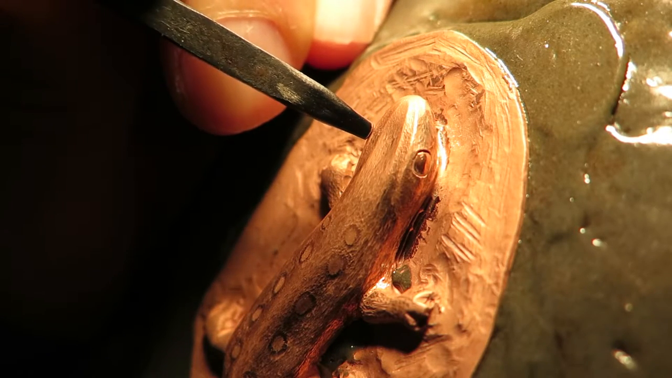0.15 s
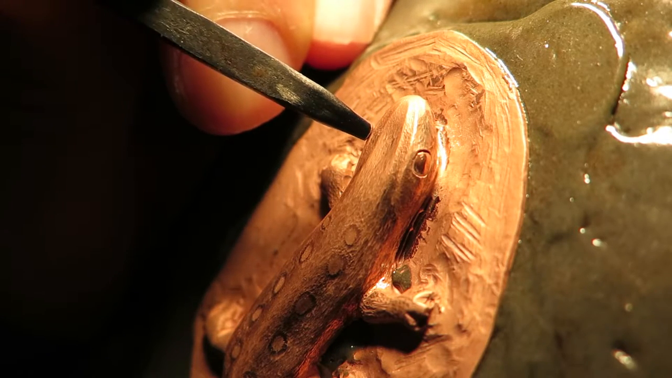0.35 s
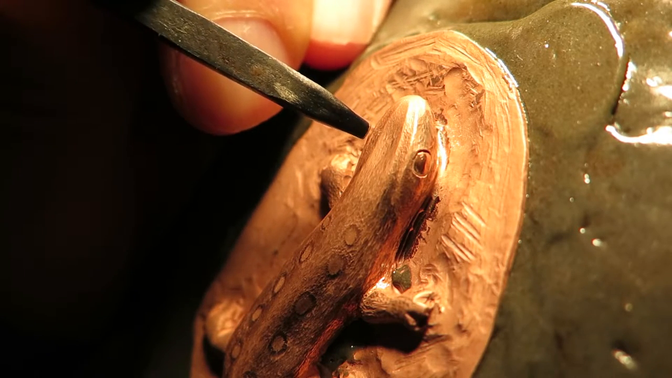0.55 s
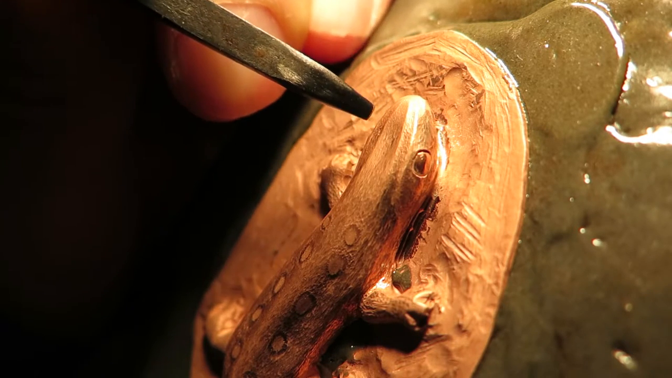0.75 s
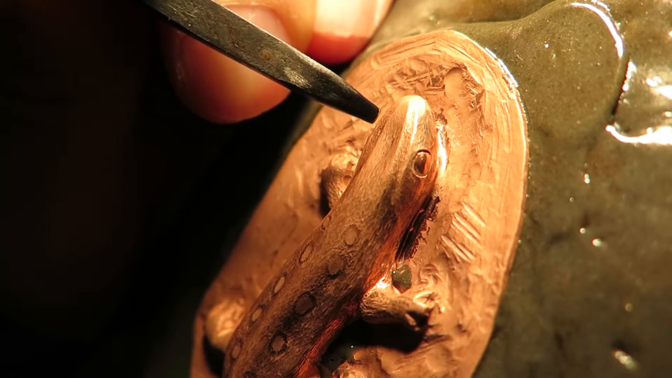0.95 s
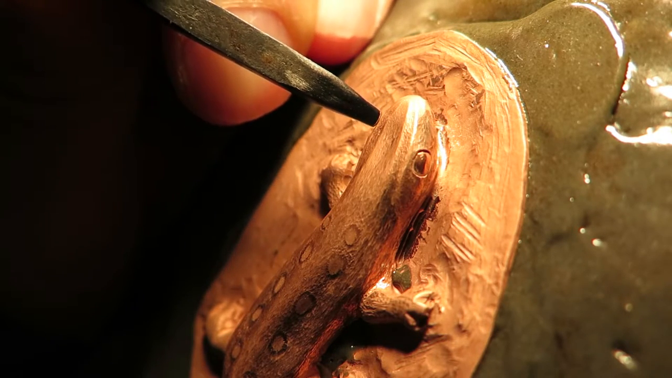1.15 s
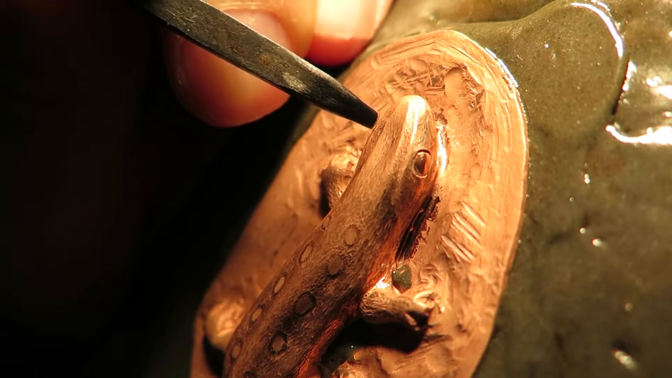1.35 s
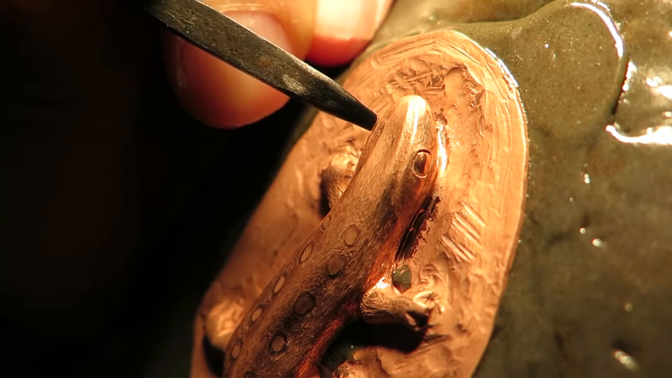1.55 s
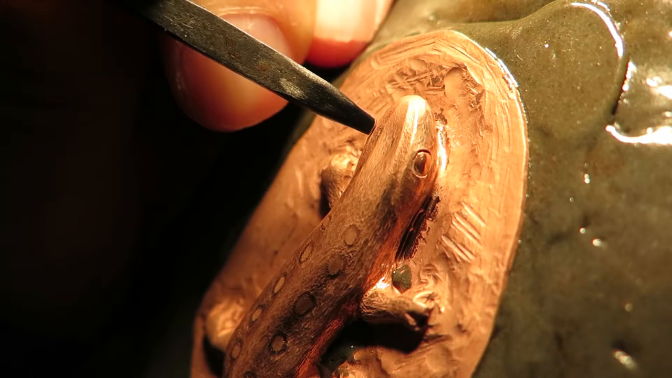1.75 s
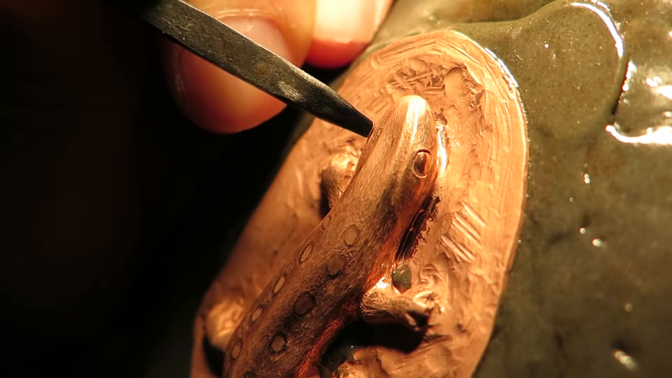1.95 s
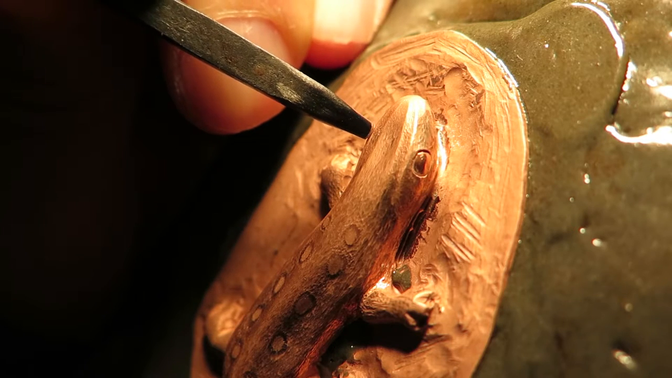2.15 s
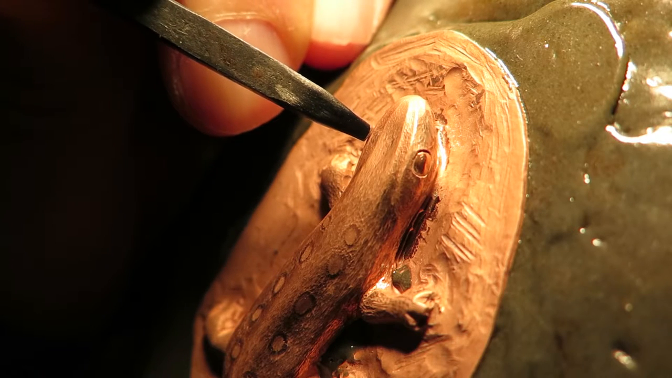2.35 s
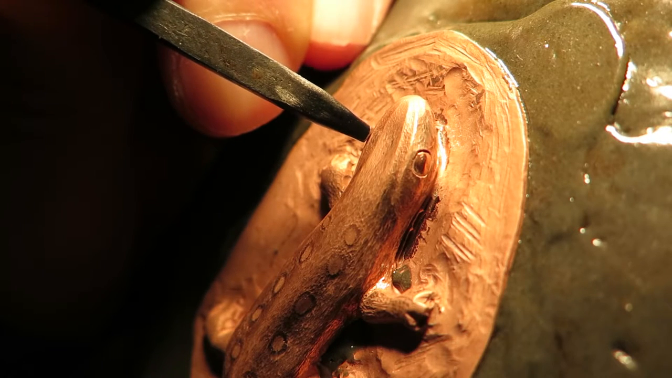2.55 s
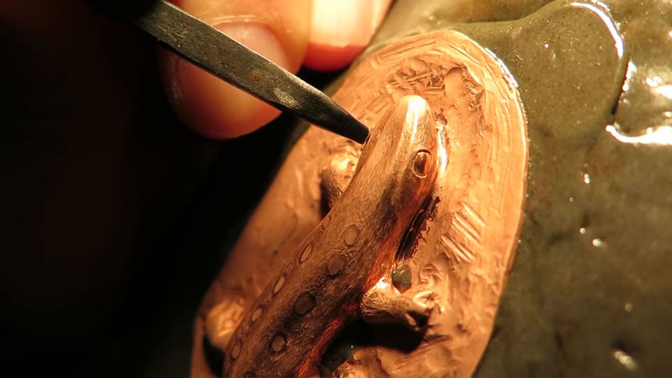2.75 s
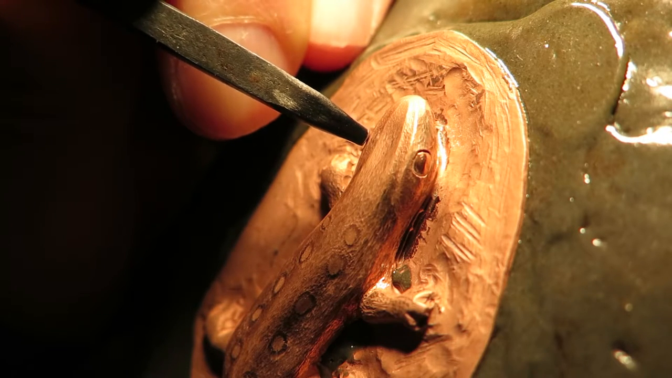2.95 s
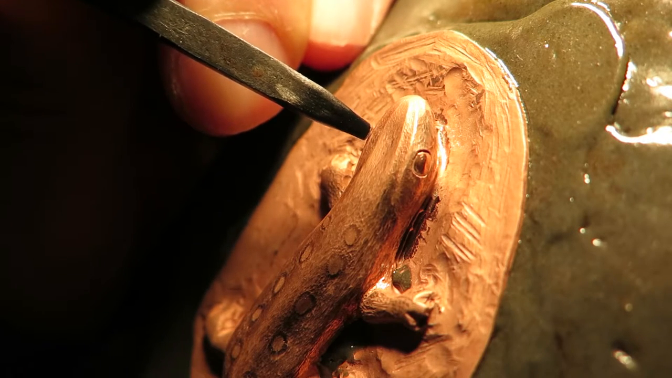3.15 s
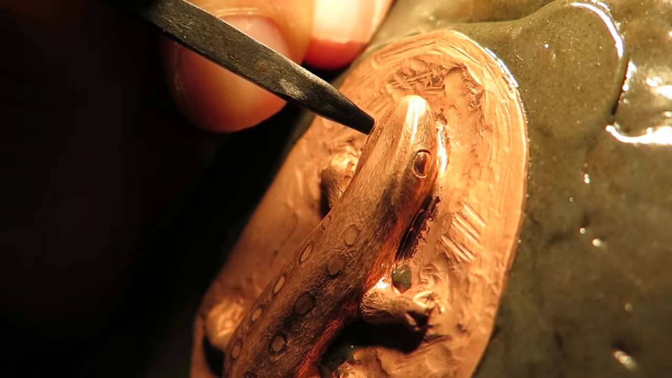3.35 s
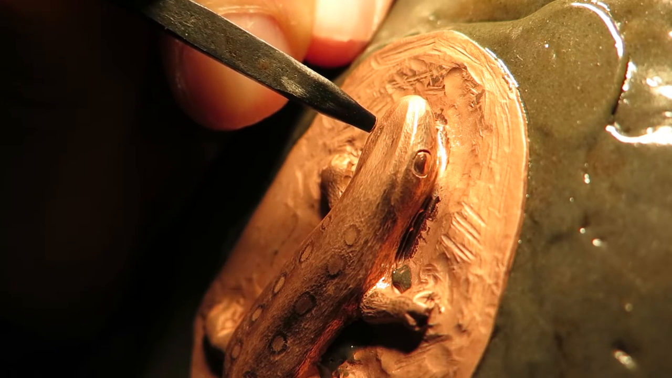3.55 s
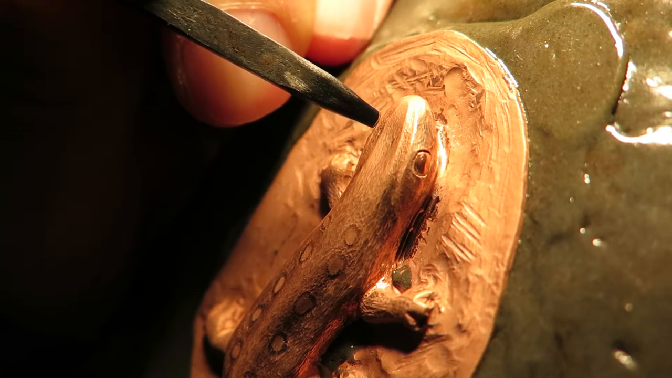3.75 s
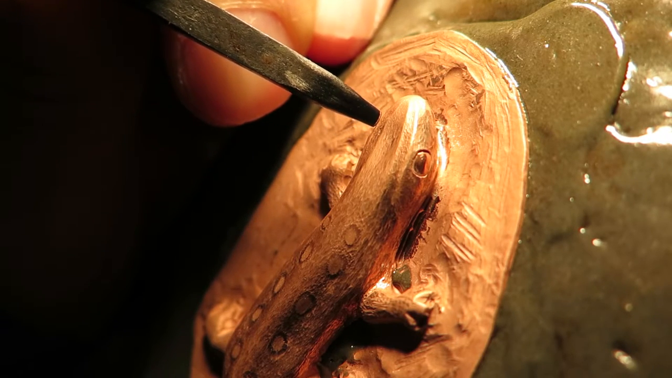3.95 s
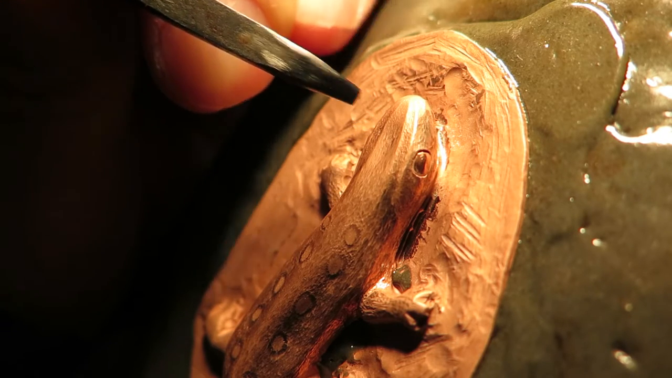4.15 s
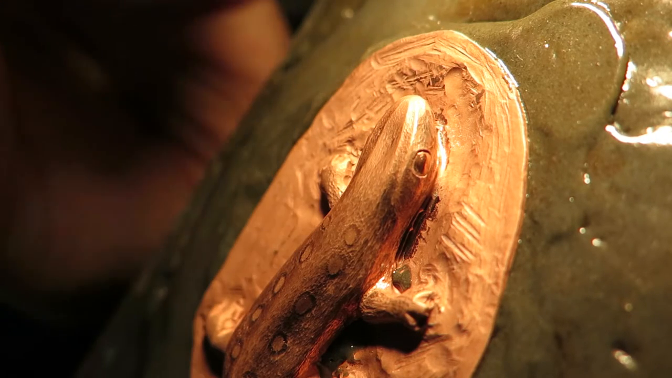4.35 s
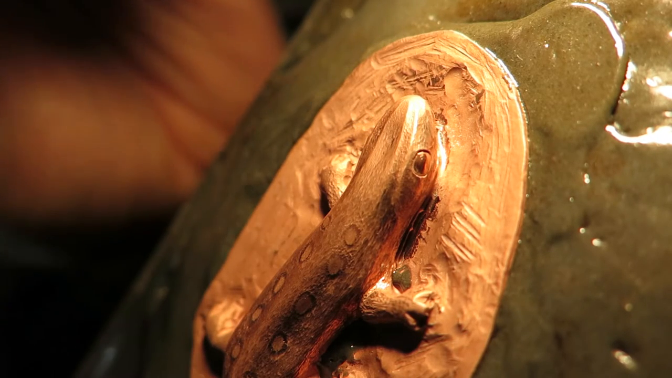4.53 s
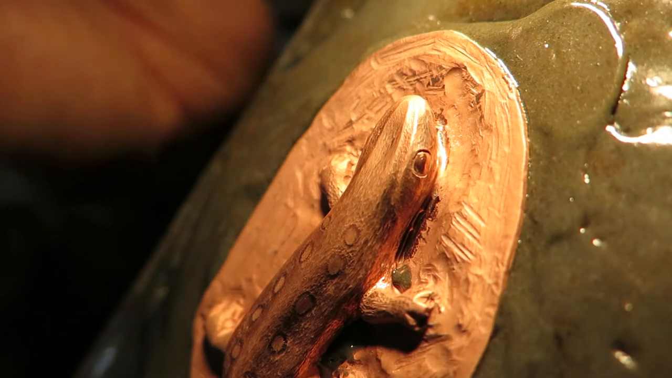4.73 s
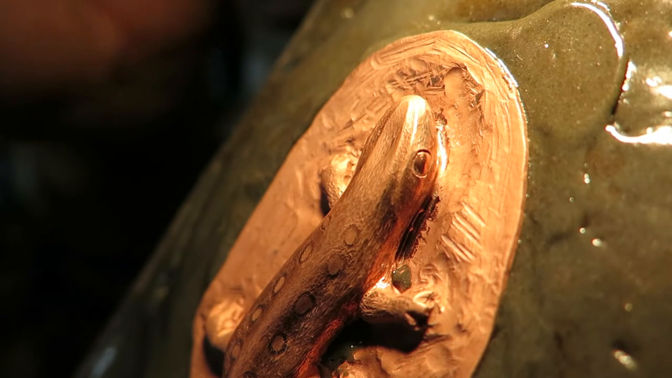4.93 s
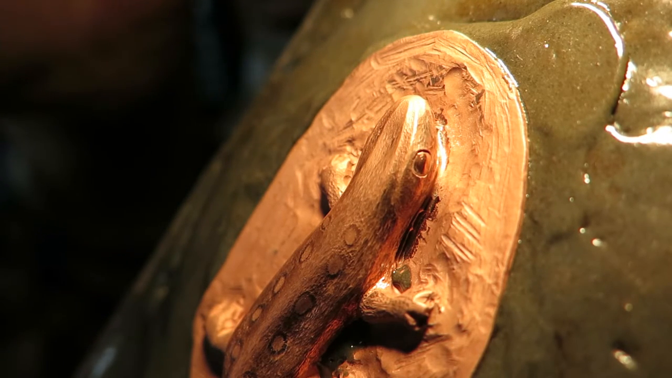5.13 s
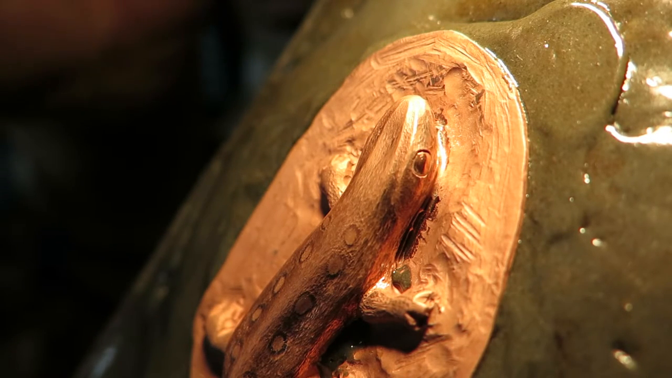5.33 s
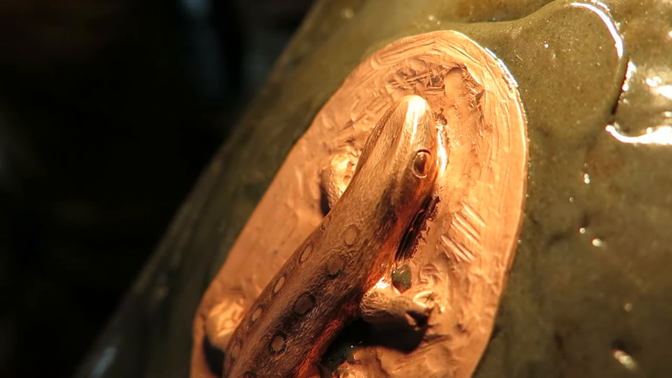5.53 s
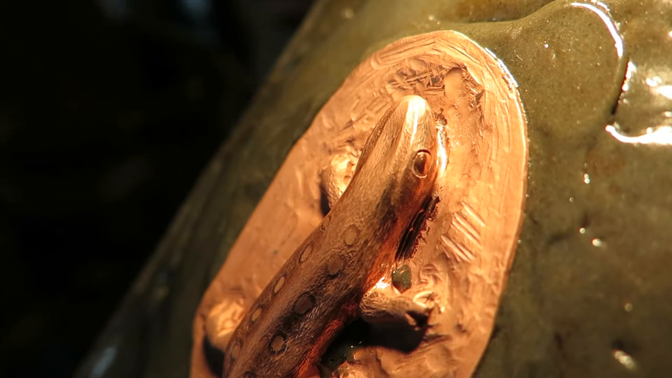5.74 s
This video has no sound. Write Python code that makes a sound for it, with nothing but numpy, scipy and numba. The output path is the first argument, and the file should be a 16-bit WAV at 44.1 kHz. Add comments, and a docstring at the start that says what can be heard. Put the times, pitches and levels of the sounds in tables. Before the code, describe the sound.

Close to a camera's stereo microphones in a quiet small workshop, a light hammer strikes a steel punch against copper bedded in pitch. About twenty crisp, dry taps come unevenly, some hard and piercing, others faint, with a pause after the first four. They stop near four seconds; faint skin brushes and a soft low rush follow over steady room air.

```python
"""A hard, bright tap over quiet room air: a small hammer drives a steel punch, close to a camera's microphones.
The punch is chasing a copper relief bedded in pitch. Hammer and punch are sums of fading modes, clicks and noise.
The tip lands with the blow or up to 4 ms after it; on landing, copper and pitch answer lower, and the room reflects.
Overloads duck the camera's gain, which creeps back over the steady air, mains hum and low rumble.
The hand then draws away in faint brushes of noise, and a soft low rush swells to a peak."""
import sys
import numpy as np
from scipy import signal
from scipy.fft import rfft, irfft, next_fast_len
from scipy.io import wavfile
from numba import njit

SR = 44100
rng = np.random.default_rng(int(sys.argv[2]) if len(sys.argv) > 2 else 0)


def dump_mix(stems):
    """Bounce the given channels to the path in sys.argv[1] as a 16-bit WAV at rate SR."""
    frames = np.atleast_2d(stems).T  # one column per channel
    limited = np.clip(frames, -1, 1)  # hard clip at full scale
    pcm = np.round(limited * 32767).astype(np.int16)
    wavfile.write(sys.argv[1], SR, pcm)


N = 255336  # samples

# Taps of the hammer; bite is how firmly the tip sits on the work:
# (time [s], delay until the tip lands [s], strength [dB], bite [dB], sharpness of the contact [dB])
TAPS = [(0.046, 0, 6, 4.5, 7.5), (0.1891, 0.0014, 2.5, 2.5, -3), (0.3393, 0.00033, 0, 3, -6),
        (.521, 0.0015, -9, -3.5, -4), (1.1711, 0, 0, -9, 1), (1.398, 0.00061, -1.5, -3, -4),
        (1.5645, 0.0028, -1.5, -4, -3), (1.8029, 0, -4, 2, -14), (1.9936, 0.00033, 10, 6.5, 13.5),
        (2.1614, 0.00043, 0, 4, -1), (2.2958, 0.00093, -15.5, -1.5, 8.5), (2.44, 0.0011, -5, 1.6, 6),
        (2.6143, .0006, 7, -8.5, -3.5), (2.7743, 0, 1.5, 1, 0), (2.9682, 0.00048, -22.5, -3, 2),
        (3.1561, 0.0015, 2, -3, 0.5), (3.3254, 0.0037, -7.5, -1.5, 7.5), (3.7141, 0.00064, 6.5, 3, 0.5),
        (3.8987, 0.0011, 2.5, 2, -14), (3.9732, 0, -17, 3, -18)]
# Modes of each part, before scatter: (frequency [Hz], relative level [dB], decay by 60 dB [s])
WORK_MODES = [(1143, -3.5, 0.0082), (1410, -11.5, 0.017), (1617, -12.5, 0.042), (1767, -13, 0.071),
              (1800, -9, 0.018), (2213.5, 4.5, 0.035), (2230, -20, 0.16), (2294, -10.5, 0.058),
              (2654, -14.5, 0.038), (2963, -8, 0.062), (3534, -21.5, 0.035)]  # the copper on its bed
BOWL_MODES = [(185, -14.5, 0.21), (672.5, -4, 0.13), (821, -8.5, 0.11), (1045.6, 1, 0.14),
              (1029.4, -0.5, 0.098), (1108, -2.5, 0.083)]  # the bowl of pitch under it
HAMMER_MODES = [(8340, -2, .013), (8680, -3, .009), (9150, -7, .006), (9770, -12, .02), (10100, 0, .011),
                (10450, -4, .007), (10950, -2, .007), (11600, -5, .005), (12300, -8, .006)]  # the hammer head
PUNCH_MODES = [(3184, -15, 0.032), (4898, -6, 0.016), (5160, -5, 0.006), (5880, -3, 0.015),
               (6080, -1.5, .007), (6694, -3.5, 0.0092), (7610, -6, 0.011)]  # the punch, damped by the fingers
BRIGHT_MODES = [(12750, -5, .005), (13850, -2, .007), (14250, 0, .009)]  # the highest ring of the steel
# Colour of each part's click and contact noise: (frequency [Hz], relative level per Hz [dB])
WORK_CRACK = [(300, -11.5), (900, -9.5), (1200, 6.5), (2400, 7.5), (3300, -5), (4000, -21.5), (5000, -18.5),
              (7000, -29)]
BOWL_CRACK = [(50, -16), (220, -4), (600, 7), (900, -13), (1300, 9.5), (2500, -29)]
HAMMER_CRACK = [(2000, -56), (4500, -43), (7000, -23), (8300, 12), (11500, 0), (13000, -2.5),
                (16000, -23.5)]
PUNCH_CRACK = [(300, -47), (2500, -34), (4000, -2), (5800, -10), (7600, 9), (10000, -4.5)]
BRIGHT_CRACK = [(5000, -47), (11000, 3), (12700, -18.5), (14300, 14), (15000, -1), (16500, -25)]
# level of each part in a middling tap [dB]
WORK_DB, PUNCH_DB, HAMMER_DB, BOWL_DB, BRIGHT_DB = -24.5, -26.5, -22.5, -32.5, -26
# dB gained per dB of strength: hard taps are brighter
HAMMER_GROWS, BOWL_GROWS, BRIGHT_GROWS = 1.41, 0.9, 1.15
# dB per dB of bite: a firm tip drives the bowl and damps the highest ring
BITE_DRIVES_BOWL, BITE_DAMPS_BRIGHT = .46, 1.39
SHARP_LIFTS_HAMMER = 0.09  # dB per dB of sharpness
TRAVEL_S = .00008  # the blow's way down the punch and into the copper
STEEL_CRACK_T60 = .004  # s


def taps():
    """The hammer meets the punch, then the landing tip strikes the work and may jolt the steel again.
    A firm bite hands the blow on to the work; a loose one leaves it ringing in the punch."""
    track = np.zeros((2, N))
    for s, gap, strength_db, bite_db, sharp_db in TAPS:
        work_db = WORK_DB + strength_db + bite_db
        punch_db = PUNCH_DB + strength_db - bite_db
        bowl_db = BOWL_DB + BOWL_GROWS * strength_db + BITE_DRIVES_BOWL * bite_db
        hammer_db = HAMMER_DB + HAMMER_GROWS * strength_db + SHARP_LIFTS_HAMMER * sharp_db
        bright_db = BRIGHT_DB + BRIGHT_GROWS * strength_db - BITE_DAMPS_BRIGHT * bite_db + sharp_db

        bowl = amp(bowl_db) * struck(BOWL_MODES, BOWL_CRACK, click_db=-4.5, crack_db=-7,
                                     crack_t60=0.022, spread_db=-5.0)
        work = amp(work_db) * struck(WORK_MODES, WORK_CRACK, click_db=-5.5, crack_db=-11.5,
                                     crack_t60=0.023, spread_db=-3.5)
        add(track, s + gap + TRAVEL_S, bowl + work)

        # a punch that already rests on the work gets no second jolt, one that travels far only a weak one
        landing = np.clip((gap - .0002) / .0008, 0, .6) * np.exp(-gap / .004)
        for when, share in ((s, 1 - landing), (s + gap, landing)):
            hammer = amp(hammer_db) * struck(HAMMER_MODES, HAMMER_CRACK, click_db=-4.0, crack_db=-6.0,
                                             crack_t60=STEEL_CRACK_T60, spread_db=-1.5)
            punch = amp(punch_db) * struck(PUNCH_MODES, PUNCH_CRACK, click_db=-2.0, crack_db=1,
                                           crack_t60=STEEL_CRACK_T60, spread_db=2.5)
            bright = amp(bright_db) * struck(BRIGHT_MODES, BRIGHT_CRACK, click_db=2.0, crack_db=-2,
                                             crack_t60=STEEL_CRACK_T60, spread_db=-13)
            # the two jolts share the energy of the blow
            add(track, when, np.sqrt(share) * (hammer + punch + bright))
    return track


SCATTER_DB = 2  # spread of the mode levels from blow to blow
DETUNE = .0015  # relative spread of the mode frequencies


def struck(modes, crack, click_db, crack_db, crack_t60, spread_db):
    """One blow: a click, fading modes and contact noise. Rows: toward the microphone, into the room."""
    hz, db, t60 = np.transpose(modes)[:, :, None]
    # the steel's high modes die sooner, so its blows are kept shorter
    size = SR // 20 if hz.min() > 2500 else SR // 5
    t = np.arange(size) / SR
    strength, shift = rng.standard_normal((2, len(modes), 1))
    hz = hz * (1 + DETUNE * shift)  # every grip is a little different
    sign = (-1) ** np.arange(len(modes))[:, None]  # neighbouring modes swing opposite ways
    decay = amp(db + SCATTER_DB * strength - 60 * t / t60)
    ring = blow((sign * decay * np.sin(2 * np.pi * hz * t)).sum(0))
    push = blow(click(crack, size))
    burst = blow(noise(crack, size) * amp(-60 * t / crack_t60))
    direct = blow(ring + amp(click_db) * push + amp(crack_db) * burst)
    # summed over all directions the sound is more even than along one path
    spread = amp(spread_db) * blow(push + ring * 0.46)
    return np.array([direct, spread])


def click(spectrum, size):
    """A single sharp push, coloured causally (minimum phase) by the part it enters."""
    hz = np.fft.rfftfreq(size, 1 / SR)
    cepstrum = irfft(np.log(amp(along(spectrum, hz))), size)
    cepstrum[size // 2:] = 0
    return irfft(np.exp(rfft(2 * cepstrum)), size)


def blow(x):
    """x scaled to the energy of 16 ms at rms 1."""
    return x / np.sqrt(np.sum(x ** 2) / (.016 * SR) + 1e-20)


# The close taps at the two microphone ports: (frequency [Hz], phase by which left leads [rad])
PORT_LEAD = [(300, .4), (1600, .3), (2200, -1), (2900, .1), (4500, 1.3), (5300, .9), (6000, 2.2), (7400, 2),
             (8500, 2.9), (10000, 3.8), (10800, 5.2), (11400, 5.8), (12200, 7.8), (15000, 8.2)]
# Balance of the ports: (frequency [Hz], left minus right level [dB])
PORT_BALANCE = [(300, 3), (1500, 0.5), (2200, -2), (2900, 3), (4600, 3), (5600, 3.5), (7300, -3.5),
                (8400, -8.5), (10000, -5), (11000, 9), (12200, -3.5), (14300, -3.5)]


def ports(x):
    """The close source meets the ports with a phase offset at the right and unequal strength."""
    side, late = np.array([[1], [-1]]) / 2, np.array([[0], [1]])

    def response(hz):
        return amp(side * along(PORT_BALANCE, hz)) * np.exp(-1j * late * along(PORT_LEAD, hz))

    return filtered(x, response)


# Decay of the room's tail: (frequency [Hz], decay by 60 dB [s])
ROOM_T60 = [(200, 0.34), (1000, 0.088), (3000, 0.17), (9000, 0.12), (15000, 0.14)]


def workshop(x, bench_db, bench_t60, room_db):
    """Quick reflections from the bench and a short tail from the room: decaying noise, new for each tap."""
    wet, size = np.zeros((2, N + SR)), SR // 4
    t = np.arange(size) / SR
    starts = [round((row[0] - .01) * SR) for row in TAPS] + [N]  # 10 ms ahead of each tap
    for a, b in zip(starts, starts[1:]):
        hz, frame_t, z = signal.stft(rng.standard_normal((2, size)), SR, nperseg=128)
        fading = z * amp(-60 * frame_t / along(ROOM_T60, hz)[:, None])
        tail = signal.istft(fading, SR, nperseg=128)[1][:, :size]
        tail = tail * (1 - np.exp(-t / 0.0042))  # soft onset
        bench = rng.standard_normal((2, size)) * amp(-60 * t / bench_t60) * (1 - np.exp(-t / 0.0021))
        answer = (amp(bench_db) * unit(bench) + amp(room_db) * unit(tail)) / np.sqrt(size)
        echo = signal.fftconvolve(x[None, a:b], answer, axes=1)
        wet[:, a:a + echo.shape[1]] += echo
    return wet[:, :N]


# Brushes of the hand as it draws away: (time of the peak [s], level [dB], length [s])
BRUSHES = [(4.325, -52.5, 0.069), (5.04, -54, .05), (5.75, -51.5, 0.42)]
BRUSH_FADE_DB = 9  # lower at both ends of a brush than at its peak


def hand():
    """Skin brushes lightly as the hand leaves the work: coloured noise that swells and fades."""
    t = np.arange(N) / SR
    # (frequency [Hz], relative level per Hz [dB])
    skin = [(500, -40), (3000, 1), (7000, -4), (11000, 7), (14000, -3), (16000, -11)]
    pressure = sum(amp(db - BRUSH_FADE_DB * np.abs(2 * (t - s) / length)) for s, db, length in BRUSHES)
    return pressure * noise(skin, (2, N))


RUSH_DB, RUSH_PEAK_S, RUSH_RISE_DB_PER_S, RUSH_FALL_DB_PER_S = -55, 5.6, 7.5, 20


def rush():
    """A soft low band of room noise swells to one peak near the end."""
    level = amp(RUSH_DB) * swell(RUSH_PEAK_S, RUSH_RISE_DB_PER_S, RUSH_FALL_DB_PER_S)
    # (frequency [Hz], relative level per Hz [dB])
    return level * noise([(120, -14), (200, -10), (300, 3), (420, -18), (800, -32)], (2, N))


def swell(peak_s, rise_db_per_s, fall_db_per_s):
    """A gain that climbs to 1 at peak_s and falls again."""
    t = np.arange(N) / SR - peak_s
    return amp(np.minimum(rise_db_per_s * t, -fall_db_per_s * t))


# Colour of the room air: (frequency [Hz], relative level per Hz [dB])
AIR = [(15, -57), (25, -21), (36, -9), (49, -5.5), (66, 0), (114, -4.5), (141, -5.5), (175, -6.5),
       (285, -5), (335, -6.5), (489, -7.5), (677, -7.5), (5280, -15), (11300, -23.5), (16000, -31.5)]
# Width of the room air: (frequency [Hz], side minus mid level [dB])
AIR_SIDE = [(60, -16), (110, 3), (200, 8), (380, 8), (700, 4), (1290, 0.5), (2380, -5), (4400, -6),
            (8120, -3.5), (15000, 1.5)]
HUM_HZ = 59.6
# the low rumble sinks slowly from the start, and faster from RUMBLE_END_S on
RUMBLE_DB, RUMBLE_SAG_DB_PER_S, RUMBLE_END_S, RUMBLE_FADE_DB_PER_S = -50, 1.5, 3.6, 15


def air(air_db, hum_db):
    """Steady coloured noise for the room air, a sine for the mains hum, and a fading low rumble."""
    t, apart = np.arange(N) / SR, np.array([[1], [-1]])
    side = filtered(noise(AIR, N), lambda hz: amp(along(AIR_SIDE, hz)))
    hiss = amp(air_db) * (noise(AIR, N) + apart * side)
    hum = amp(hum_db) * np.sqrt(2) * np.sin(2 * np.pi * HUM_HZ * t)
    # (frequency [Hz], relative level per Hz [dB])
    low = [(20, -31), (45, -3.0), (90, -2), (135, 5.0), (200, -11.0), (400, -46), (1500, -70)]
    late_fade_db = RUMBLE_FADE_DB_PER_S * np.maximum(t - RUMBLE_END_S, 0)
    rumble_db = RUMBLE_DB - RUMBLE_SAG_DB_PER_S * t - late_fade_db
    rumble = amp(rumble_db) * unit(noise(low, N) + amp(-7.5) * apart * noise(low, N))
    return hiss + hum + rumble


def amp(db):
    """Decibels to gain."""
    return 10 ** (np.asarray(db) / 20)


def unit(x):
    """x at rms 1."""
    return x / np.sqrt(np.mean(x ** 2) + 1e-20)


def along(points, hz):
    """(frequency [Hz], value) points, interpolated on a log frequency axis."""
    f, v = np.transpose(points)
    return np.interp(np.log(hz + 1), np.log(f + 1), v)


def filtered(x, response):
    """x times a response of frequency."""
    n = x.shape[-1]
    m = next_fast_len(n + 4096)
    return irfft(rfft(x, m) * response(np.fft.rfftfreq(m, 1 / SR)), m)[..., :n]


def noise(spectrum, size):
    """Coloured noise of rms 1."""
    return unit(filtered(rng.standard_normal(size), lambda hz: amp(along(spectrum, hz))))


def add(track, s, sound):
    """Mix a sound into a track at time s."""
    part = track[:, max(round(s * SR), 0):][:, :sound.shape[1]]
    part += sound[:, :part.shape[1]]


def scene():
    """Close taps at the ports, their reflections, the hand and the quiet workshop."""
    direct, spread = taps()
    echoes = workshop(spread, bench_db=-6.5, bench_t60=0.021, room_db=-14.5)
    return ports(direct) + echoes + hand() + rush() + air(air_db=-47.5, hum_db=-66.5)


@njit
def gain_control(peak, limit, step_db, release, start_db):
    """Each sample over the limit steps the gain down; it creeps back with a time constant of release samples."""
    gain, cut = np.empty(len(peak)), start_db
    for i in range(len(peak)):
        gain[i] = 10 ** (-cut / 20)
        if peak[i] * gain[i] > limit:
            cut += step_db
        cut -= cut / release
    return gain


TOP_HZ = 15800  # the camera's band limit


def record(dry):
    """The camera ducks on overload, clips what gets through and cuts steeply above its band limit."""
    peak = np.abs(dry).max(0)  # the louder port steers both
    gain = gain_control(peak, limit=0.83, step_db=1.02, release=.35 * SR, start_db=5.5)
    clipped = np.clip(dry * gain, -1.2, 1.05)
    return filtered(clipped, lambda hz: 1 / np.sqrt(1 + (hz / TOP_HZ) ** 160))


dry = scene()
out = record(dry)
dump_mix(out)
```